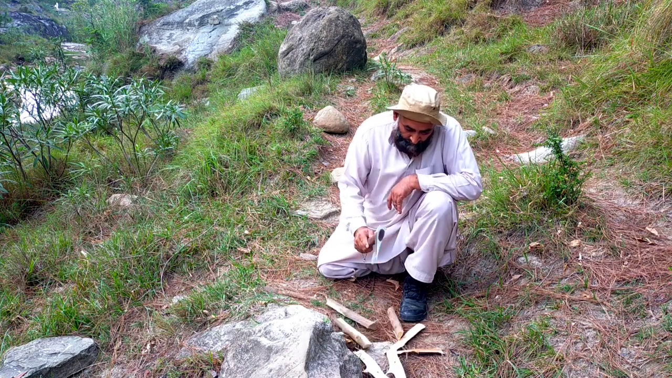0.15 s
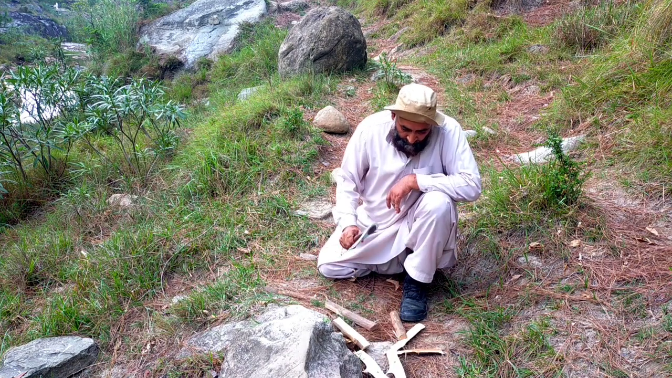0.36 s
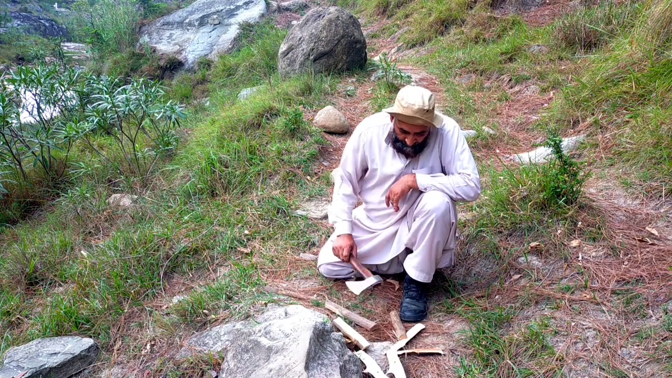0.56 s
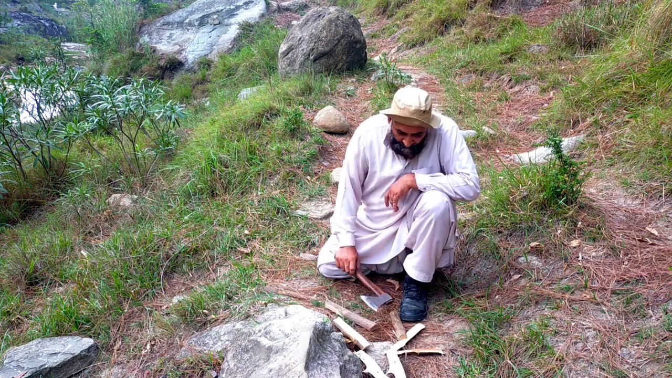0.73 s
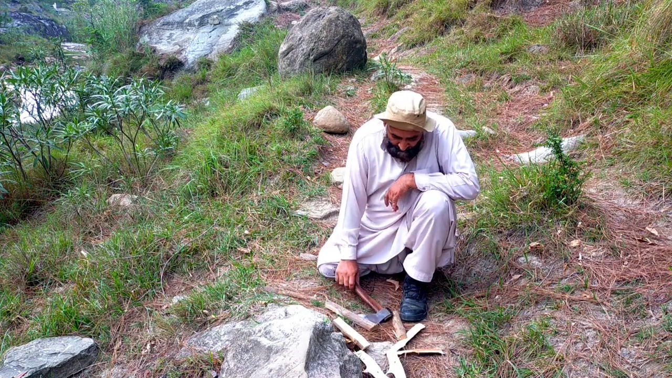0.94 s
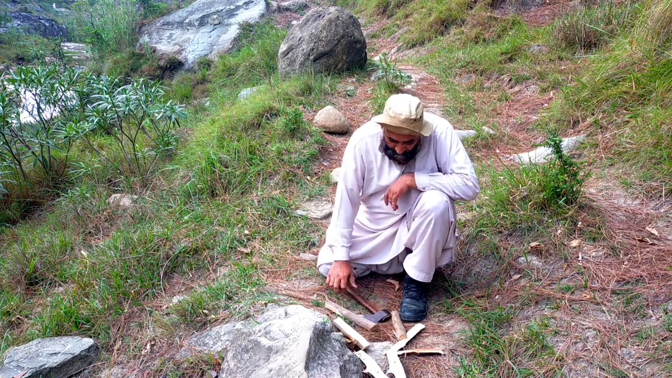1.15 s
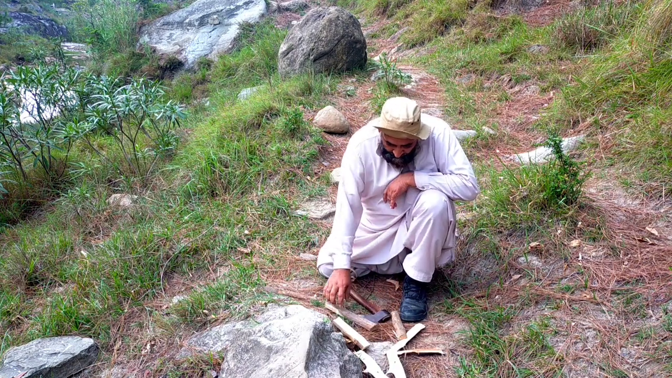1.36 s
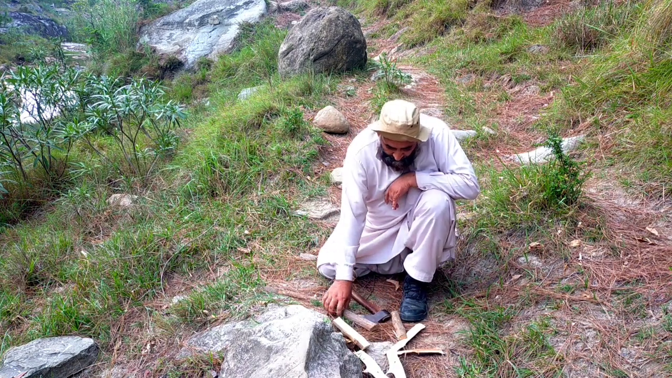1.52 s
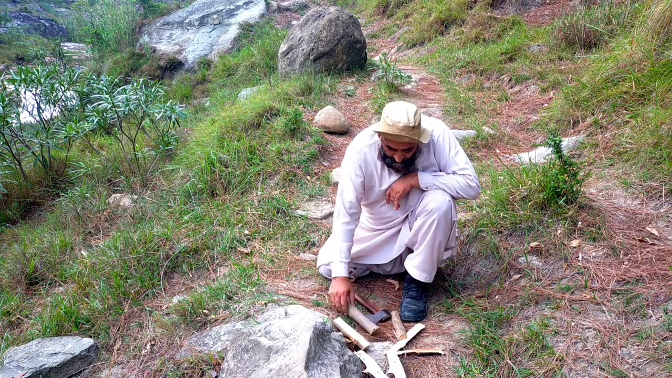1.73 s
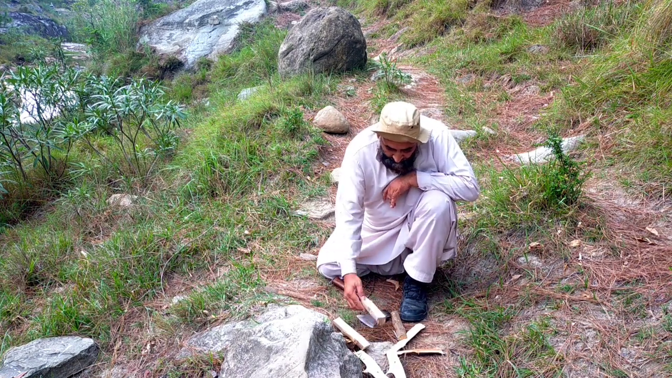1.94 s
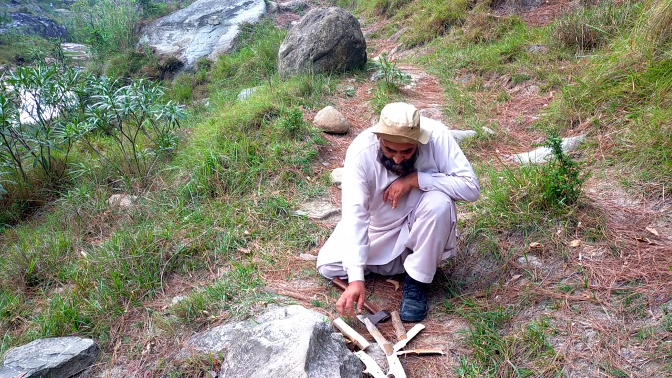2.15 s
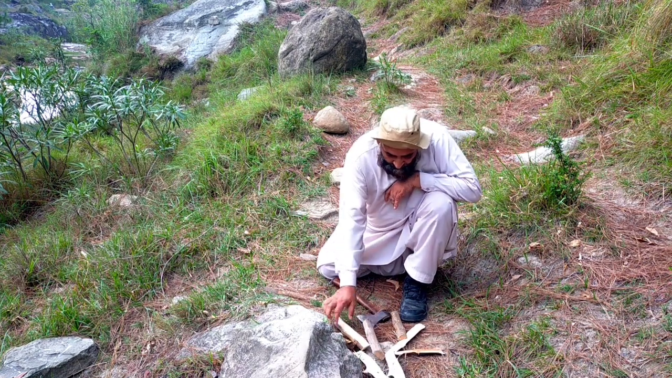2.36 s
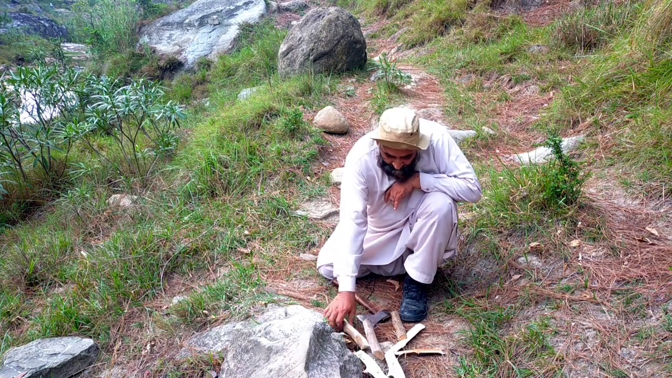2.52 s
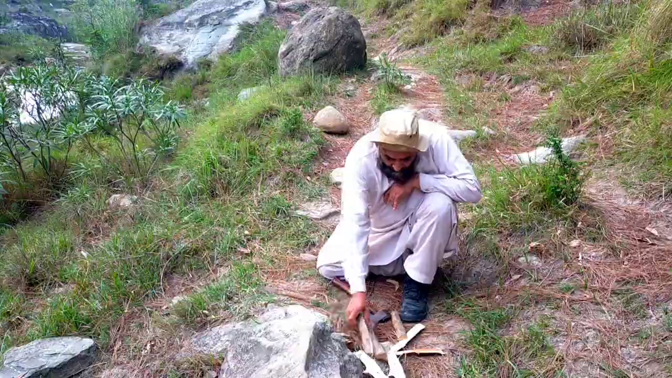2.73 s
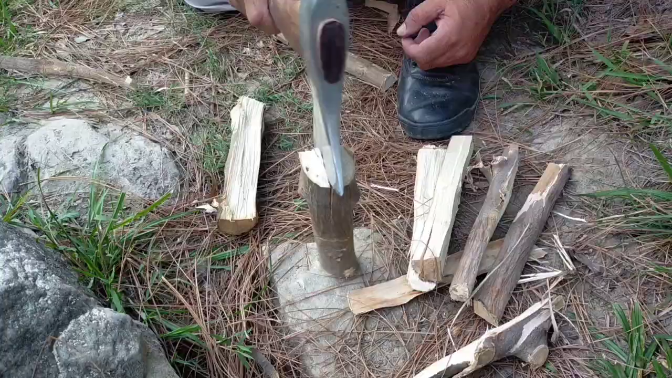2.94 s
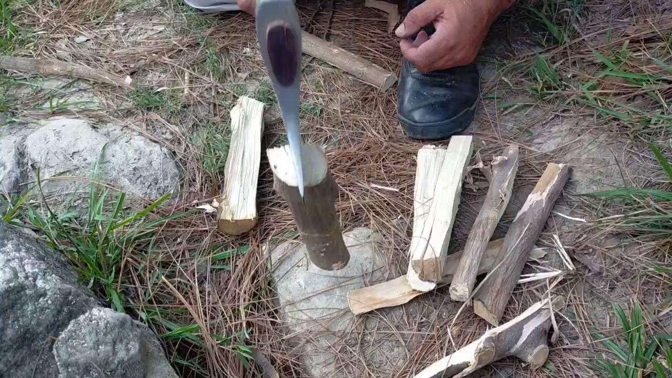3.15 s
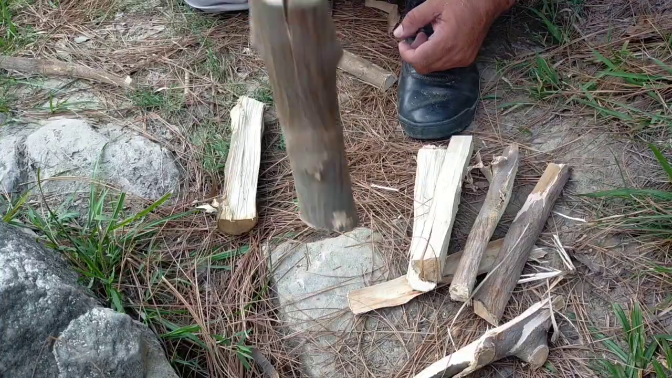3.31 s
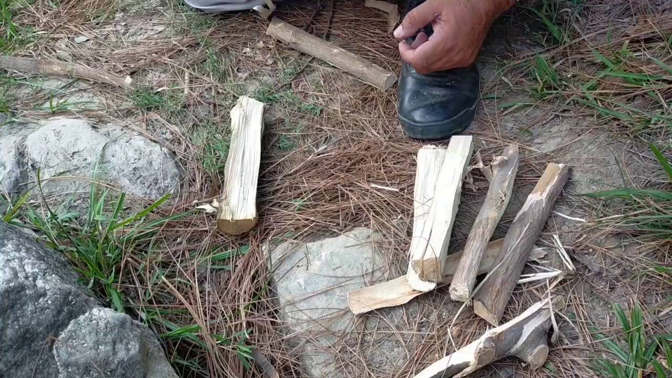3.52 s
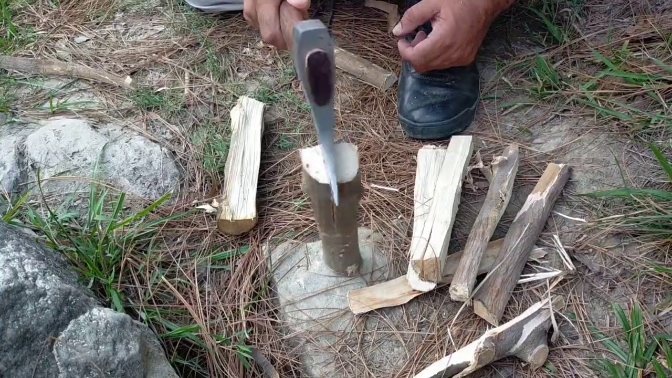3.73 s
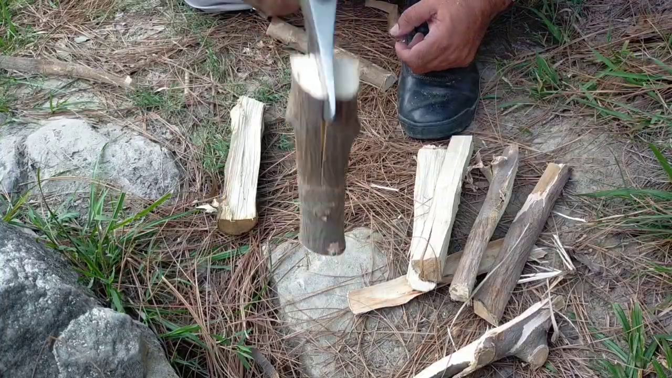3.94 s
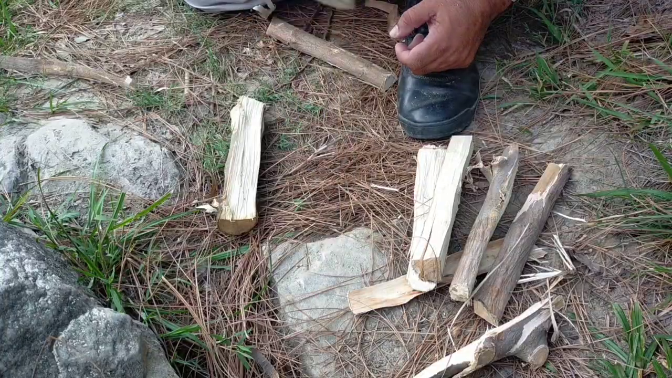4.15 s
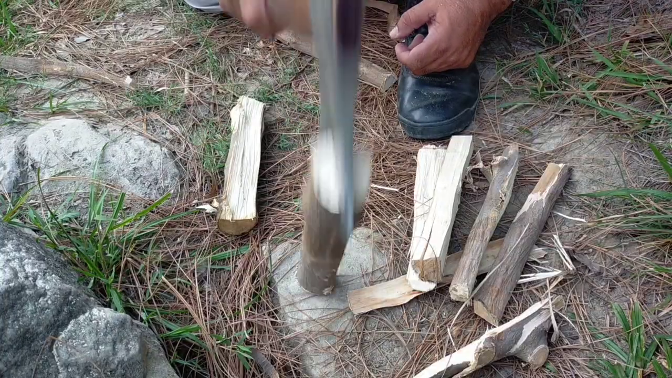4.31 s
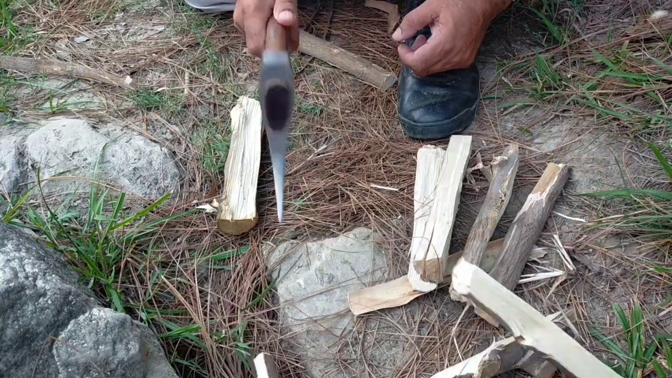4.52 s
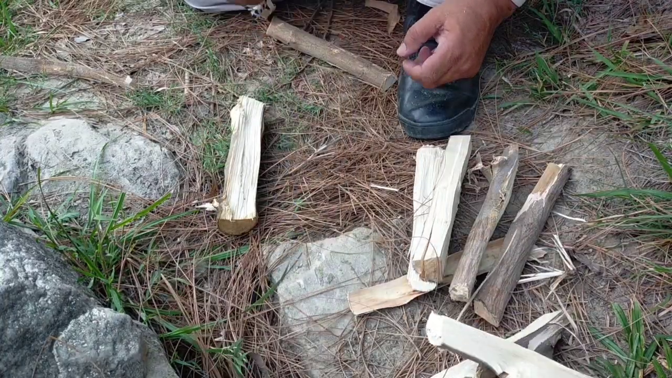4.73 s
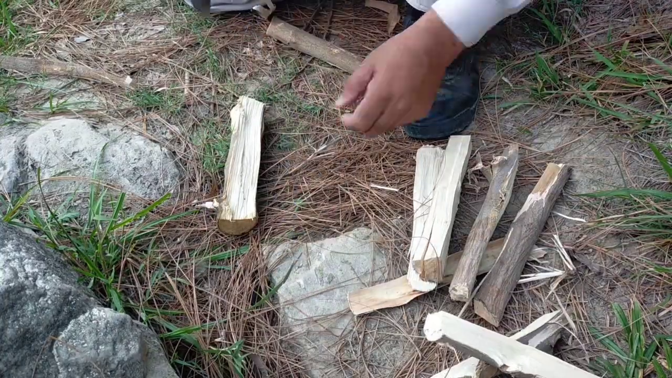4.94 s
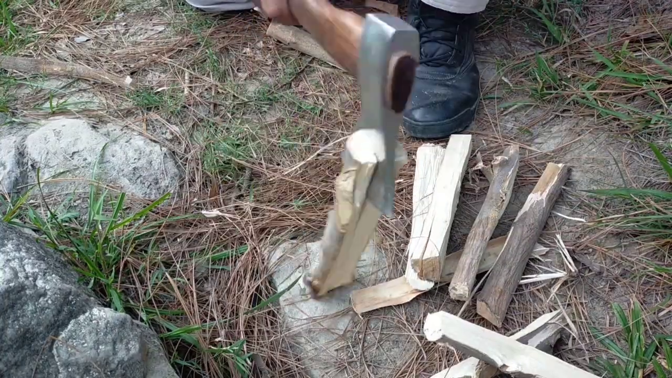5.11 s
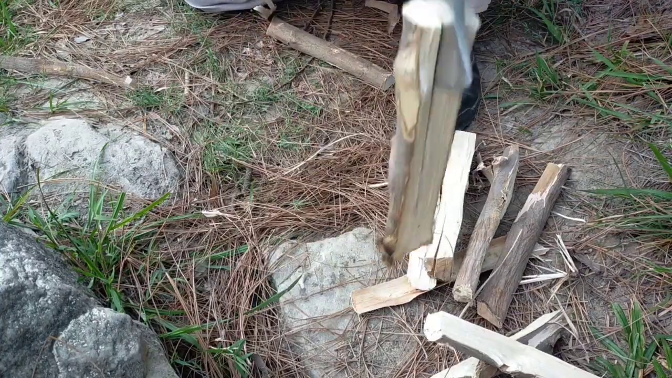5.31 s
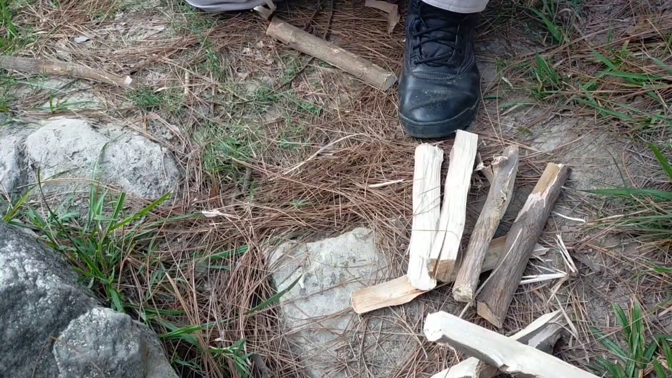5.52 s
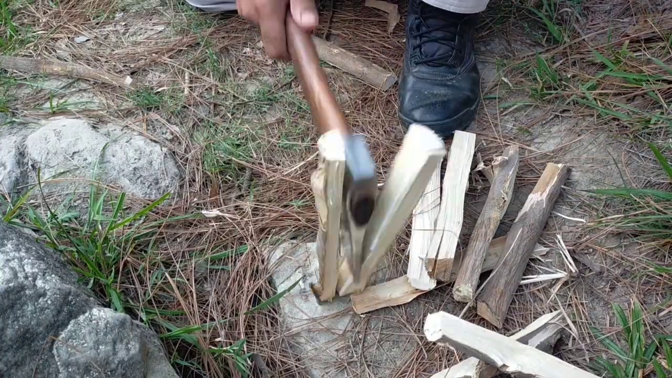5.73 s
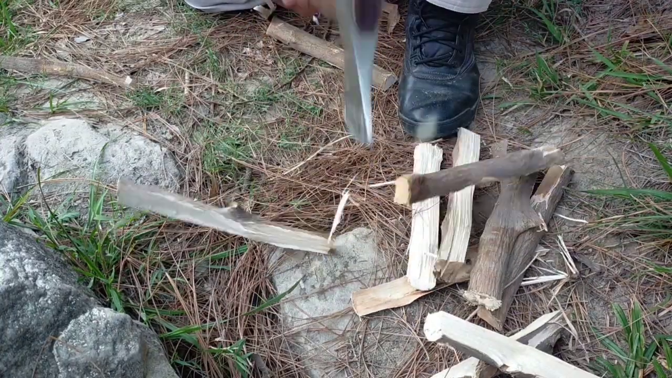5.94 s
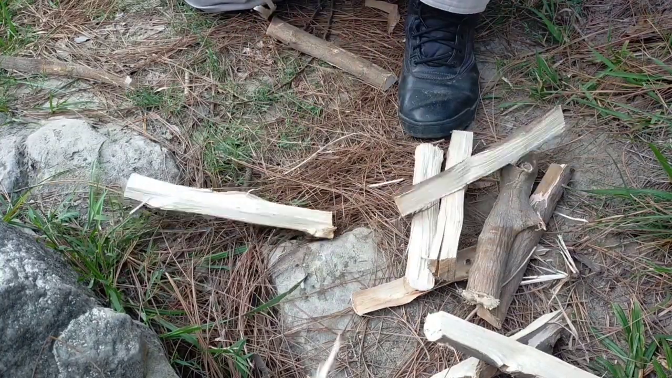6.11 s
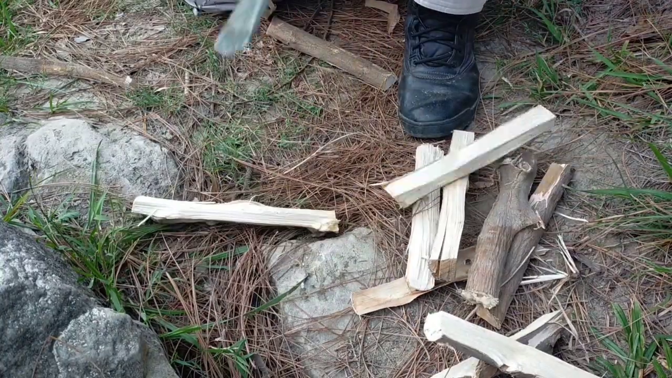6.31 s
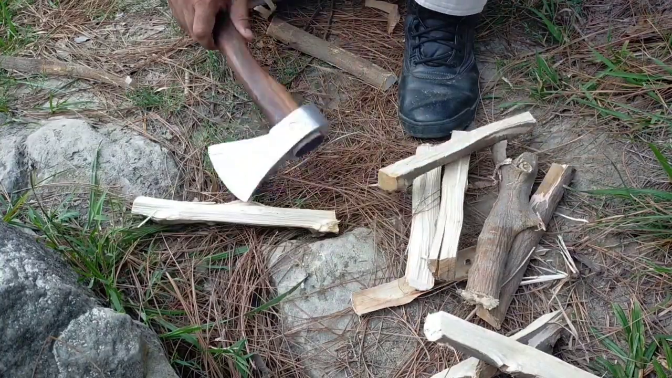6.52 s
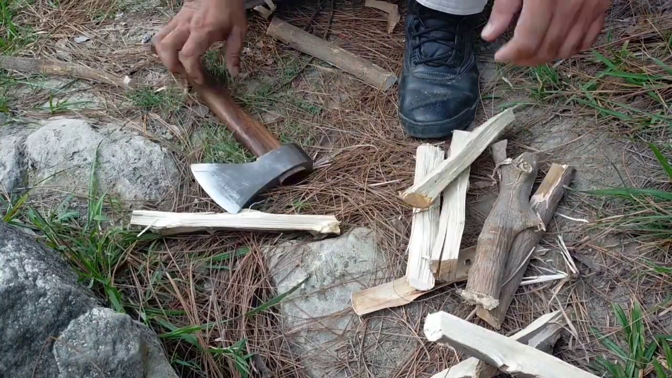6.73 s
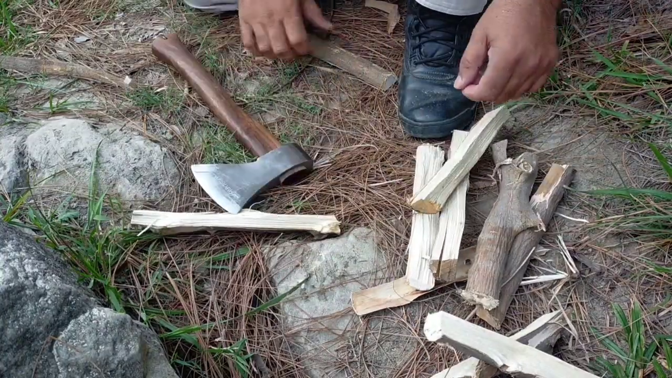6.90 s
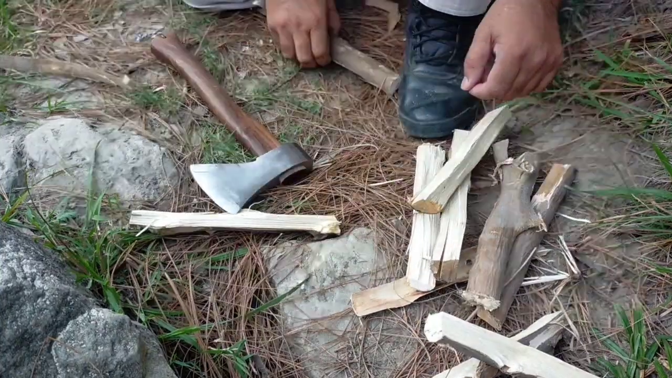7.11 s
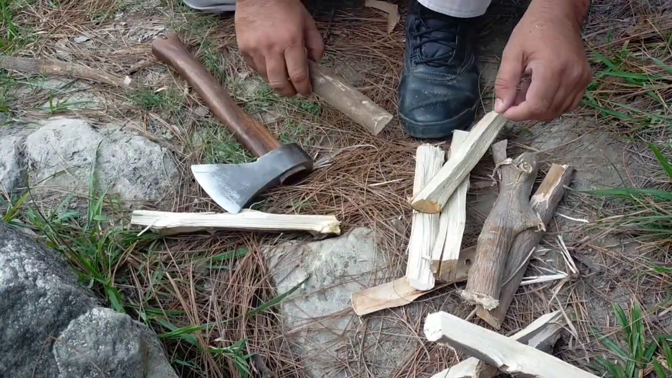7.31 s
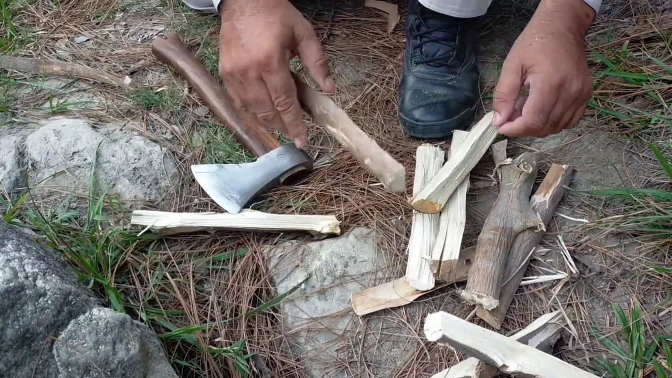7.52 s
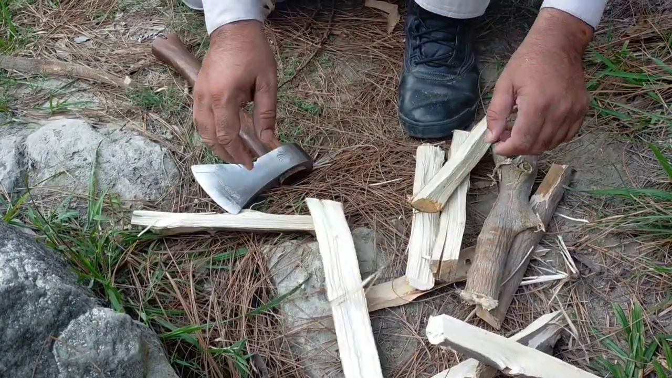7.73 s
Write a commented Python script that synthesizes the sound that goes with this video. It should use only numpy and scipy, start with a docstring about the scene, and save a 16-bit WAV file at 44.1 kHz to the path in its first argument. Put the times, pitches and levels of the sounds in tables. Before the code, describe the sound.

On a quiet open hillside a hatchet cracks into a small billet, and sticks knock down at once. Far falling whistles and a buzzy songbird follow, then one loud stick clack. After the faint hum and hiss stop, chops split the wood with tearing fibres, ringing steel and clattering pieces. Birds trill again before a last stick drops. The wood is close and dry to the microphone.

```python
"""Splitting kindling on a hillside

A hatchet splits wood on a stone: short pushes and dull modes make the knocks, bursts of grains the tearing,
pure damped modes the ringing steel, and modes with noise ticks the sticks clattering into dry needles. A
trilled songbird is near; gliding tones through scattered paths make the far birds and animals. Patchy noise is
the open air. For the first three seconds a low hum and a high hiss swell beneath it; at 3 s the background
changes and they are gone."""
import sys
import numpy as np
from scipy import signal
from scipy.fft import rfft, irfft, next_fast_len
from scipy.io import wavfile
from scipy.ndimage import uniform_filter1d, map_coordinates

SR = 44100
rng = np.random.default_rng(int(sys.argv[2]) if len(sys.argv) > 2 else 0)


def to_wav(s):
    """Save 16-bit WAV."""
    ch = np.atleast_2d(s).T  # columns
    pcm = np.round(np.clip(ch, -1, 1) * 32767)  # PCM
    wavfile.write(sys.argv[1], SR, pcm.astype(np.int16))


N = 346626  # length in samples

# Levels are relative settings in dB; t60 is the time to die away by 60 dB.
# colour of the air's far rush: pitch_hz, level_db
AIR_COLOUR = [(25, -46.5), (108, -4.5), (220, -16.5), (489, -11), (680, -10), (863, -12.5), (2480, -9),
              (3160, -14.5), (5730, -31.5), (6920, -34), (16000, -46.5)]
# the far rush after the early stretch: time_s, level_db
AIR_LEVEL = [(3.6, -53.5), (4.3, -52), (6.6, -53.5), (6.9, -49)]
# colour of the hiss: pitch_hz, level_db
HISS_COLOUR = [(6300, -21.5), (7800, -5.5), (8700, 1), (9400, -15), (16000, -32)]
# colour of the low rumble: pitch_hz, level_db
RUMBLE_COLOUR = [(30, -31.5), (70, 2), (150, 0), (280, -4.5), (450, -14.5), (900, -39)]
# rise and fall of the rumble: time_s, level_db
RUMBLE_LEVEL = [(4.1, -62), (5.2, -58), (5.6, -62), (6.1, -52.5), (6.55, -60), (6.8, -53.5), (7.8, -52)]
# a brief low drone: start_s, length_s, start_hz, end_hz, level_db
DRONES = [(5.97, 0.39, 131.5, 120.7, -49.5)]
# how long echoes off the trees last: pitch_hz, t60_s
SLOPE_ECHO = [(200, 0.27), (2000, 0.71), (5000, 0.27), (12000, 0.041)]
# hands and wood stir the litter: loudest_s, length_s, level_db
STIRS = [(1.928, 0.34, -52.5), (2.828, 0.34, -55.5), (4.651, 0.62, -51.5), (5.365, 0.09, -49.5),
         (6.1, 0.49, -56)]
# needles and splinters snapping: start_s, level_db
SNAPS = [(2.314, -24), (2.417, -37.5), (3.923, -40.5), (3.942, -40), (5.426, -43), (6.156, -35),
         (6.4066, -42)]
# colour of breaking fibres: pitch_hz, level_db
FIBRE_COLOUR = [(300, -12), (1500, 4.5), (3500, -1.5), (5000, -9.5), (6500, -12.5), (8500, -2),
                (11000, -13.5), (15500, -24)]
# modes of the steel hatchet head: pitch_hz, level_db, t60_s
BLADE_MODES = [(5334, 4, 0.069), (9740, 1, 0.069)]
# when the steel rings: start_s, level_db
BLADE_HITS = [(0.011, -42), (4.491, -27.5), (5.899, -14.5)]
# loose sticks striking stone and each other: start_s, level_db, main_hz, main_t60_s,
# upper_hz, upper_db (relative to the main mode), tick_db, contact_s
CLACKS = [(.0116, 0.5, 2126, 0.027, 4890, -13, -28, 0.0018),
          (0.2017, -2.5, 1677, 0.038, 2245, -2, -24, 0.0063),
          (0.229, -26.5, 1745, 0.069, 4200, -6, -24.5, 0.0028),
          (2.3046, 6.5, 1166, 0.065, 2280, -23, -20.5, 0.0065),
          (4.584, -26, 915, 0.074, 1760, 0.5, -25.5, 0.0013),
          (4.6414, -5, 1598, 0.078, 3770, -19.5, -12.5, 0.001),
          (4.8086, -24, 932, 0.05, 1600, -23, -31.5, 0.00063),
          (5.347, -17.5, 1556, 0.034, 2320, -20, -32, 0.0024),
          (5.368, -34, 1155, 0.1, 1770, 3.5, -34, 0.0021), (5.896, -17, 1844, 0.063, 2786, -3, -21, 0.0012),
          (6.022, -16, 1700, 0.041, 3670, -12, -31.5, 0.0081),
          (6.0483, -32.5, 1140, 0.063, 2070, -8, -29.5, 0.00064),
          (6.088, -33.5, 915, 0.084, 1370, 7, -39.5, 0.0091),
          (6.266, -34.5, 1800, 0.05, 2385, 4.5, -40.5, 0.003),
          (6.713, -29.5, 1044, 0.044, 1780, 5, -38, 0.0071),
          (7.81, -14, 1156, 0.14, 3050, -16.5, -22, 0.0027),
          (7.84, -28, 2130, 0.018, 2960, 16.5, -26, 0.004)]
# weak modes shared by all sticks: ratio to the main mode, level_db (relative to it)
STICK_MODES = [(1.4, -29.5), (1.8, -28.5)]
# colour of a stick's tick: pitch_hz, level_db
TICK_COLOUR = [(150, -22.5), (600, 3.5), (1500, 16), (3200, 6.5), (4500, -18.5), (6500, -30.5), (8700, -8),
               (12000, -32)]
# the blade bites into the billet: start_s, knock_db, knock_hz, body_db, tear_db
BITES = [(.012, -0.5, 820, -13.5, -12), (0.059, -9, 1710, -18, -16), (3.8339, -3, 1030, -17.5, -28),
         (3.8352, 0.5, 2100, -13, -25.5), (4.4817, -2.5, 1045, -11.5, -16.5),
         (5.2288, -2, 1040, -14, -21.5), (5.8888, -1, 853, -10.5, -20), (5.8955, -9, 1740, -22, -24),
         (5.9443, -4, 2720, -18.5, -29)]
# the billet is driven onto the stone: start_s, thud_db, knock_db, knock_hz
LANDINGS = [(0.0146, -20.5, -18.5, 520), (0.0591, -19, -17, 700), (3.852, -24, -24, 2000),
            (4.521, -14, -3.5, 556), (5.2378, -21, -17.5, 490), (5.951, -21.5, -7.5, 474)]
# the split runs on between blows: start_s, tear_db
SPLITS = [(.051, -27.5), (4.5058, -18), (5.906, -26), (5.924, -20.5)]
# colour of the billet's dense modes: pitch_hz, level_db
BILLET_COLOUR = [(35, -9), (110, -5), (220, 1), (340, -12.5), (550, 8.5), (1000, 2), (1400, -4.5),
                 (2100, 3), (3000, -13), (4500, -25), (16000, -46)]
# how long the billet rings: pitch_hz, t60_s
BILLET_DECAY = [(130, 0.09), (600, 0.04), (2000, 0.043), (8000, 0.13)]
# a far bird's falling whistles: start_s, length_s, level_db
WHISTLES = [(0.377, 0.29, -45.5), (0.744, .13, -43.5), (1.047, 0.2, -44), (1.325, .16, -48.5),
            (1.562, 0.15, -45), (1.907, 0.23, -46.5), (2.442, 0.17, -45), (2.781, 0.22, -48),
            (3.107, .2, -47)]
# the near songbird: start_s, swell_s, fade_s, start_hz, end_hz, level_db, trill_hz, trill_depth (0 to 1)
SONG_NOTES = [(.778, 0.034, 0.066, 1592, 1541, -32.5, 172, 0.61),
              (.932, 0.038, 0.038, 2191, 2129, -21.5, 206.6, 0.23),
              (1.067, 0.0082, 0.01, 2500, 1480, -29.5, 328, 1),
              (1.073, 0.028, .04, 1637, 1645, -31.5, 177, 0.18),
              (1.105, 0.042, 0.027, 1695, 1680, -23, 190, 0.23),
              (1.07, 0.026, .1, 2270, 2195, -35.5, 204.3, .85),
              (1.165, 0.022, 0.055, 1830, 1800, -35.5, 199.4, 0.7),
              (1.195, .033, .05, 1634, 1480, -26, 179, 0.03),
              (1.16, 0.055, 0.075, 2055, 2120, -27, 197, 0.5),
              (1.19, .014, 0.055, 2292, 2266, -33, 230, 0.6),
              (7.23, 0.026, 0.041, 2390, 2395, -29.5, 234, 0.55),
              (7.275, 0.014, 0.025, 2380, 2370, -34.5, 212, 0.96),
              (7.42, 0.018, 0.063, 2160, 2350, -29.5, 331.5, 0.47),
              (7.467, 0.013, 0.035, 2100, 1500, -36, 326, 0.52),
              (7.596, 0.0293, 0.028, 1934, 2050, -33.5, 112.5, 0.61),
              (7.63, 0.016, 0.027, 2128, 2166, -27.5, 113, 0.28),
              (7.672, 0.016, 0.021, 2154, 2080, -32, 109, 0.17)]
# level of an overtone by its own pitch: pitch_hz, level_db
OVERTONE_COLOUR = [(3000, -23.5), (4700, -45), (7400, -53.5), (8500, -33.5), (9400, -37.5), (10600, -38),
                   (11500, -62)]
# thin notes of other birds: start_s, length_s, start_hz, end_hz, level_db
THIN_NOTES = [(0.944, 0.11, 4580, 4800, -55), (1.832, 0.051, 3780, 4280, -51.5),
              (1.976, 0.028, 2290, 2163, -45), (4.038, 0.089, 3780, 3496, -59.5),
              (4.168, 0.16, 3120, 2990, -60.5), (4.652, 0.097, 3460, 2940, -57),
              (4.954, 0.062, 3140, 2780, -52.5), (5.006, 0.067, 2420, 2060, -51),
              (5.103, 0.04, 1920, 2063, -45), (7.151, 0.035, 2440, 2500, -41), (7.405, .3, 3260, 3550, -58)]
# when a smaller bird starts its phrase: start_s
SWOOP_STARTS = [2.635, 2.852]
# its phrase, a held cap and an arch, each diving away: time_s (after the start), pitch_hz, level_db
SWOOP = [(0, 3763, -37), (.018, 3917, -38), (.041, 3894, -35), (.053, 2590, -51), (.064, 2254, -46),
         (0.076, 3550, -42.5), (.086, 4170, -40), (.099, 4000, -34.5), (.122, 1880, -54)]
# tones that make up the phrase: ratio to the main partial, level_db
SWOOP_PARTIALS = [(.5, -10.5), (1, -2), (1.5, -4)]
# fading of its high partials: pitch_hz, level_db
SWOOP_COLOUR = [(4200, 0.5), (5000, -7), (5900, -23), (6300, -40)]
# bouts of the faint chorus: start_s, end_s, lowest_hz, highest_hz (of a chirp's middle), level_db
CHORUS = [(3.155, 3.42, 2056, 2730, -50.5), (4.238, 4.559, 2026, 2586, -52.5),
          (4.549, 5.201, 1686, 3310, -54), (4.02, 5.195, 3130, 4640, -69.5), (5.647, 5.88, 1910, 2565, -56),
          (6.248, 6.52, 3380, 4680, -63), (6.471, 7.65, 5130, 6220, -73), (6.733, 6.87, 2294, 2773, -47.5),
          (6.803, 7.25, 1870, 3990, -61)]
# long calls of far animals: start_s, hold_s, top_hz, sag_hz_per_s, level_db
HOWL_CALLS = [(3.662, 0.021, 582, 0, -62.5), (3.92, 0.31, 711.4, 130, -54.5),
              (3.969, 0.31, 653.6, 139, -56), (4.745, .33, 737, 131, -50)]

EARLY_END_S = 3  # hum and hiss stop here
EARLY_SWELL_DB_PER_S = 3  # growth of hum and hiss
HUM_HZ, HUM_DB, HISS_DB = 77.5, -50, -61  # levels at their loudest
EARLY_AIR_DB, EARLY_AIR_SWELL_DB_PER_S = -46, 1  # far rush just before EARLY_END_S, and its growth
STIR_FADE_DB, LITTER_REST_DB = 21.5, -73  # drop at the ends of a stir; crackle between stirs
STICK_DAMPING = 0.13  # higher modes die sooner by this power
TICK_T60_S, TICK_PER_CONTACT = 0.02, 9.7  # base tick time; extra seconds per second of contact
TICK_ECHO_DB, TICK_ECHO_T60_S = -31, 0.15  # a faint, longer echo follows each tick
BITE_THUD_DB = -22.5  # what reaches the ground from a bite, relative to the body
LANDING_BODY_DB, LANDING_TEAR_DB = -1.5, -14.5  # relative to the thud
SPLIT_BODY_DB = -5.5  # the billet's answer, relative to the tearing
THUD_LAG_S = 0.006  # the ground gives way just after the knock
WHISTLE_START_HZ, WHISTLE_END_HZ = 4196, 3240  # shared by all the falling whistles
WHISTLE_EDGE_DB = 7  # a glide starts and ends this far under its middle
WHISTLE_DIRECT_DB, WHISTLE_SPREAD_S = -11, 0.04  # straight path against scattered paths; their smear
ROCK_ECHO_S, ROCK_ECHO_DB = 0.06, -15.5  # a boulder throws the song back
TRILL_SWING, TRILL_UNEVEN = 0.085, 0.091  # pitch swing at full depth; scatter of the trill rate (fractions)
TRILL_LAG = 0.85  # radians by which the dip in pitch trails the swell in loudness
RASP = 0.025  # random pitch bend at full depth (fraction)
NOTE_ROUNDING, NOTE_FLUTTER_DB = 0.8, 3.5  # power of the swell and fade; unsteadiness at full depth
CHORUS_RATE = 70  # chirps a second
CHIRP_S, CHORUS_SPREAD_S, CHORUS_DIRECT_DB = 0.035, 0.024, -8  # chirp length, smear, straight path
HOWL_RISE_S, HOWL_FALL_S = 0.0669, 0.22  # climb from the resting pitch and sinking back to it
HOWL_REST_HZ, HOWL_EDGE_DB = 562, 7  # pitch at both ends, and how far they lie under the held level
HOWL_FLUTTER_DB = 3.5  # the calls quaver
HOWL_SPREAD_S, HOWL_DIRECT_DB = 0.11, 1.5  # smear and straight path
TOP_HZ = 15600  # upper edge of the sound


def amp(db):
    """Turn decibels into gain."""
    return 10 ** (np.asarray(db) / 20)


def unit(x):
    """Scale to rms 1."""
    return x / np.sqrt(np.mean(x ** 2) + 1e-20)


def along(points, hz):
    """Read (pitch, value) points on a log pitch axis."""
    f, v = np.transpose(points)
    return np.interp(np.log(hz + 1), np.log(f + 1), v)


def curves(rows, t):
    """Read each column after the time at the times t."""
    s, *cols = np.transpose(rows)
    return [np.interp(t, s, c) for c in cols]


def wobble(rate, size):
    """Draw a smooth random curve with rate knots a second."""
    knots = rng.standard_normal(int(size * rate / SR) + 4)
    return map_coordinates(knots, [np.arange(size) * rate / SR])


def filtered(x, response):
    """Shape x by a gain that depends on frequency."""
    m = next_fast_len(len(x) + 8192)
    return irfft(rfft(x, m) * response(np.fft.rfftfreq(m, 1 / SR)), m)[:len(x)]


def coloured(x, spectrum):
    """Give x a (pitch, dB) colour, at rms 1."""
    return unit(filtered(x, lambda hz: amp(along(spectrum, hz))))


def dying(x, decay):
    """Let each frequency of x die with its own t60."""
    hz, t, z = signal.stft(x, SR, nperseg=128)
    fade = amp(-60 * t / along(decay, hz)[:, None])
    return signal.istft(z * fade, SR, nperseg=128)[1][:len(x)]


def grains(rate, spread_db, size):
    """Scatter tiny fractures at random, a few much larger than the rest."""
    sizes = amp(spread_db * np.minimum(rng.exponential(size=size), 4))
    return (rng.random(size) < rate / SR) * sizes * rng.choice([-1, 1], size)


def ring(hz, t60, t):
    """One damped mode: a sine that dies away."""
    return np.sin(2 * np.pi * hz * t) * amp(-60 * t / t60)


def turn(hz):
    """Add up a changing frequency into a running phase."""
    return 2 * np.pi * np.cumsum(hz) / SR


def add(out, s, x):
    """Mix x into out at time s."""
    i = max(round(s * SR), 0)
    out[i:i + len(x)] += x[:max(N - i, 0)]


def whistle(s, length, start_hz, end_hz, db):
    """Make (time, pitch, dB) rows of a straight glide, loudest in its middle."""
    return [(s, start_hz, db - WHISTLE_EDGE_DB),
            (s + length / 2, (start_hz + end_hz) / 2, db),
            (s + length, end_hz, db - WHISTLE_EDGE_DB)]


def tone(rows, waver):
    """A pure tone along (time, pitch, dB) rows, slightly unsteady in pitch."""
    t = np.arange(rows[0][0], rows[-1][0], 1 / SR)
    soft_ends = np.clip(np.minimum(t - t[0], t[-1] - t) / 0.005, 0, 1)
    hz, db = curves(rows, t)
    hz = uniform_filter1d(hz, size=300) * (1 + waver * wobble(70.07, len(t)))
    return np.sqrt(2) * amp(db) * soft_ends * np.sin(turn(hz))


def glides(notes, waver):
    """Place clear notes, each at its own time."""
    out = np.zeros(N)
    for rows in notes:
        add(out, rows[0][0], tone(rows, waver))
    return out


def scattered(notes, waver, spread, direct_db):
    """Far notes each take their own paths through the trees, which smear them over spread seconds."""
    out, t = np.zeros(N), np.arange(SR // 4) / SR
    for rows in notes:
        paths = rng.standard_normal(len(t)) * np.exp(-t / spread)
        paths /= np.linalg.norm(paths)
        paths[0] += amp(direct_db)
        add(out, rows[0][0], signal.fftconvolve(tone(rows, waver), paths))
    return out


def hillside(x, wet_db):
    """Add the diffuse answer of trees and rocks to the direct sound, at constant power."""
    t = np.arange(SR // 2) / SR
    tail = dying(rng.standard_normal(len(t)), SLOPE_ECHO) * np.minimum(t / 0.015, 1)
    echo = signal.fftconvolve(x, tail / np.linalg.norm(tail))[:N]
    return (x + amp(wet_db) * echo) / np.hypot(1, amp(wet_db))


def patchy_noise(spectrum):
    """Coloured noise whose level varies in random patches of time and pitch."""
    z = signal.stft(rng.standard_normal(N), nperseg=512)[2]
    patches = uniform_filter1d(rng.standard_normal(z.shape), 4, 0)
    patches = unit(uniform_filter1d(patches, 14, 1))
    noise = signal.istft(z * amp(2.08 * patches), nperseg=512)[1][:N]
    return coloured(noise, spectrum)


def hum(swell):
    """A low sine that wavers in pitch."""
    hz = HUM_HZ * (1 + 0.02 * wobble(70, N))
    return np.sqrt(2) * amp(HUM_DB) * swell * np.sin(turn(hz))


def drone():
    """A brief low tone that glides down and wavers."""
    return glides([whistle(*note) for note in DRONES], waver=0.02)


def open_air():
    """Patchy noise makes a far rush, a rumble and an early hiss; hum and drone are single tones."""
    t = np.arange(N) / SR
    early = t < EARLY_END_S
    early_air_db = EARLY_AIR_DB + EARLY_AIR_SWELL_DB_PER_S * (t - EARLY_END_S)
    air_db = np.where(early, early_air_db, curves(AIR_LEVEL, t)[0])
    swell = early * amp(EARLY_SWELL_DB_PER_S * (t - EARLY_END_S))
    rush = amp(air_db) * patchy_noise(AIR_COLOUR)
    hiss = amp(HISS_DB) * swell * patchy_noise(HISS_COLOUR)
    rumble = amp(curves(RUMBLE_LEVEL, t)[0]) * patchy_noise(RUMBLE_COLOUR)
    return rush + hiss + rumble + hum(swell) + drone()


def needles():
    """Dry litter crackles in tiny fractures under hands and wood, with single sharper snaps."""
    now = np.arange(N) / SR
    stirring = amp(LITTER_REST_DB)
    for s, length, db in STIRS:
        stirring = stirring + amp(db - STIR_FADE_DB * np.abs(now - s) / (length / 2))
    out = stirring * amp(wobble(28, N)) * coloured(grains(900, 2.5, N), FIBRE_COLOUR)
    t = np.arange(SR // 40) / SR
    for s, db in SNAPS:
        snap = coloured(rng.standard_normal(len(t)), FIBRE_COLOUR)
        add(out, s, 0.45 * amp(db - 60 * t / 0.037) * snap)
    return out


def blade():
    """The steel sings in two damped modes as the opening wood lets it go."""
    out, t = np.zeros(N), np.arange(SR // 4) / SR
    for s, db in BLADE_HITS:
        modes = sum(amp(level) * ring(hz, t60, t) for hz, level, t60 in BLADE_MODES)
        add(out, s, amp(db) * modes * (1 - np.exp(-t / 0.013)))
    return out


def sticks():
    """A falling stick ticks and rings; longer contact slows the ring's swell and draws out the tick."""
    out, t = np.zeros(N), np.arange(SR // 5) / SR
    for s, db, hz, t60, upper_hz, upper_db, tick_db, contact in CLACKS:
        partials = [(hz, 0), (upper_hz, upper_db)]
        partials += [(hz * ratio, level) for ratio, level in STICK_MODES]
        modes = sum(amp(level) * ring(f, t60 * (hz / f) ** STICK_DAMPING, t) for f, level in partials)
        fade = amp(-60 * t / (TICK_T60_S + TICK_PER_CONTACT * contact))
        fade += amp(TICK_ECHO_DB - 60 * t / TICK_ECHO_T60_S)
        tick = coloured(rng.standard_normal(len(t)), TICK_COLOUR) * fade
        add(out, s, amp(db) * modes * (1 - np.exp(-t / contact)) + amp(tick_db) * tick)
    return out


def knock(db, hz, t):
    """A push that dies within a few cycles."""
    return 1.65 * amp(db) * ring(hz, 7 / hz, t) * (1 - np.exp(-t * hz / 0.39))


def body(db, t):
    """The billet's dull ring: so many modes that shaped, dying noise stands for them."""
    modes = dying(coloured(rng.standard_normal(len(t)), BILLET_COLOUR), BILLET_DECAY)
    return amp(db) * modes * (1 - np.exp(-t / 0.000083))


def tear(db, force, t):
    """A harder blow drives the crack further down the grain, then the last fibres let go."""
    run = np.exp(-(t / (0.0048 + 0.0035 * force)) ** 2)
    last_fibres = 0.25 * np.exp(-t / 0.014)
    fractures = coloured(grains(9000, 2.7, len(t)), FIBRE_COLOUR)
    return amp(db) * fractures * (run + last_fibres) * (1 - np.exp(-t / 0.0018))


def ground_thud(t):
    """The ground gives one low, quickly damped pulse."""
    return 3.45 * ring(138.0, 0.028, t) * (1 - np.exp(-(t / 0.0037) ** 2))


def chops():
    """Blows join a push, the billet's ring and tearing fibres; bites and landings also thud the ground."""
    out, t = np.zeros(N), np.arange(SR // 5) / SR
    thud = ground_thud(t)
    for s, knock_db, hz, body_db, tear_db in BITES:
        blow = knock(knock_db, hz, t) + body(body_db, t) + tear(tear_db, amp(knock_db), t)
        add(out, s, blow + amp(body_db + BITE_THUD_DB) * thud)
    for s, thud_db, knock_db, hz in LANDINGS:
        add(out, s + THUD_LAG_S, amp(thud_db) * thud)
        wood = body(thud_db + LANDING_BODY_DB, t) + tear(thud_db + LANDING_TEAR_DB, 0, t)
        add(out, s, knock(knock_db, hz, t) + wood)
    for s, db in SPLITS:
        add(out, s, tear(db, 0, t) + body(db + SPLIT_BODY_DB, t))
    return out


def falling_whistles():
    """A far bird's pure tones glide down and are smeared by the trees."""
    notes = [whistle(s, length, WHISTLE_START_HZ, WHISTLE_END_HZ, db) for s, length, db in WHISTLES]
    return scattered(notes, 0.024, WHISTLE_SPREAD_S, WHISTLE_DIRECT_DB)


def songbird():
    """Notes swell and fade, made buzzy by an uneven trill of loudness and pitch."""
    out = np.zeros(N)
    for s, swell, fade, start_hz, end_hz, db, trill_hz, depth in SONG_NOTES:
        t = np.arange(0, swell + fade, 1 / SR)
        shape = np.interp(t, [0, swell, swell + fade], [0, 1, 0]) ** NOTE_ROUNDING
        flutter_db = NOTE_FLUTTER_DB * np.sqrt(abs(depth)) * wobble(122, len(t))
        level = shape * amp(db + flutter_db)
        trill = turn(trill_hz * (1 + TRILL_UNEVEN * wobble(66, len(t))))
        bend = depth * (RASP * wobble(349, len(t)) - TRILL_SWING * np.sin(trill - TRILL_LAG))
        hz = np.linspace(start_hz, end_hz, len(t)) * (1 + bend)
        phase = turn(hz)
        overtones = sum(amp(along(OVERTONE_COLOUR, k * hz)) * np.sin(k * phase) for k in range(2, 7))
        add(out, s, 2 * level * (1 + depth * np.sin(trill)) * (np.sin(phase) + overtones))
    add(out, ROCK_ECHO_S, amp(ROCK_ECHO_DB) * out)
    return hillside(out, wet_db=-18.0)


def thin_notes():
    """Other birds give short gliding tones, smeared by the trees."""
    return scattered([whistle(*note) for note in THIN_NOTES], 0.008, CHORUS_SPREAD_S, 0)


def swooping_bird():
    """A smaller bird swoops through its phrase in three parallel partials."""
    swoops = []
    for start in SWOOP_STARTS:
        for ratio, partial_db in SWOOP_PARTIALS:
            swoops.append([(start + s, ratio * hz, db + partial_db + along(SWOOP_COLOUR, ratio * hz))
                           for s, hz, db in SWOOP])
    return hillside(glides(swoops, waver=0.0043), wet_db=-18.0)


def faint_chorus():
    """Many short chirps at random pitches overlap in bouts."""
    chirps = []
    for start, end, low_hz, high_hz, db in CHORUS:
        for s in np.arange(start, end, 1 / CHORUS_RATE):
            hz = rng.uniform(low_hz, high_hz)
            fall = rng.uniform(-0.05, 0.1)  # below zero, the chirp rises
            chirp_start = s - rng.random() / CHORUS_RATE
            chirp_db = db + rng.normal(0, 1.5)
            chirps.append(whistle(chirp_start, CHIRP_S, hz * (1 + fall), hz * (1 - fall), chirp_db))
    return scattered(chirps, 0.015, CHORUS_SPREAD_S, CHORUS_DIRECT_DB)


def howl(s, hold, top_hz, sag, db):
    """Make (time, pitch, dB) rows of a call that climbs, is held with any sag and sinks away."""
    top = s + HOWL_RISE_S
    return [(s, HOWL_REST_HZ, db - HOWL_EDGE_DB),
            (top, top_hz, db),
            (top + hold, top_hz - sag * hold, db),
            (top + hold + HOWL_FALL_S, HOWL_REST_HZ, db - HOWL_EDGE_DB)]


def howls():
    """Far animals call in long tones that quaver and are smeared by the trees."""
    calls = scattered([howl(*call) for call in HOWL_CALLS], 0.017, HOWL_SPREAD_S, HOWL_DIRECT_DB)
    return calls * amp(HOWL_FLUTTER_DB * wobble(45, N))


def scene():
    """Mix all sources: the woodwork is close and nearly dry, the far birds echo more."""
    wood = hillside(blade() + sticks() + chops(), wet_db=-37.5)
    far_birds = hillside(falling_whistles() + thin_notes() + faint_chorus(), wet_db=-11.0)
    near_birds = songbird() + swooping_bird()
    return (open_air() + needles() + wood + far_birds + near_birds + howls())[None]


def record(dry):
    """Round off the highest peaks, then weaken the deepest lows and cut the top treble."""
    x = dry[0] / (1 + np.abs(dry[0]) ** 6) ** (1 / 6)
    x = signal.sosfilt(signal.butter(3, 55, "high", fs=SR, output="sos"), x)
    return filtered(x, lambda hz: 1 / np.sqrt(1 + (hz / TOP_HZ) ** 160))[None]


dry = scene()
out = record(dry)
to_wav(out)
```